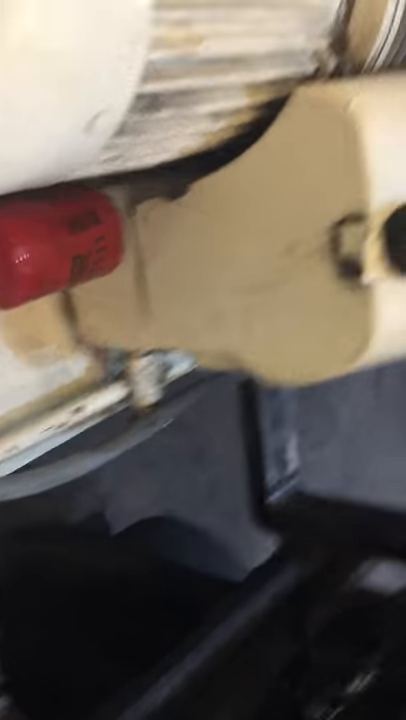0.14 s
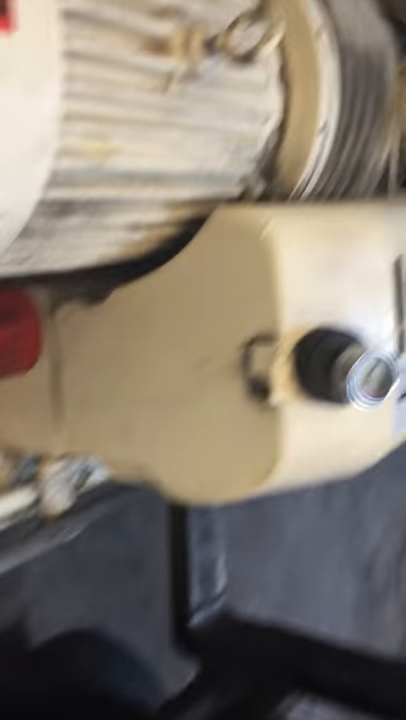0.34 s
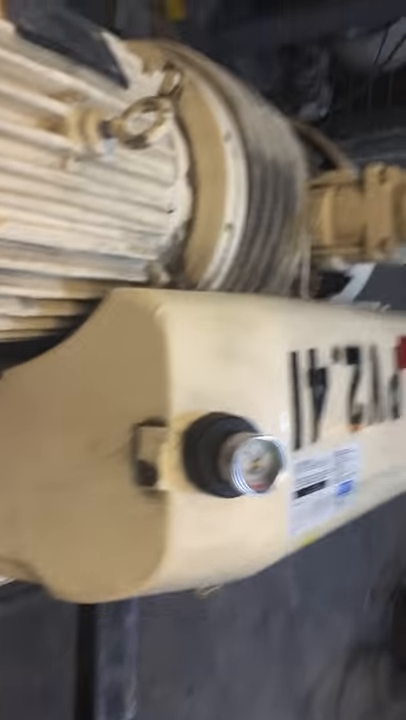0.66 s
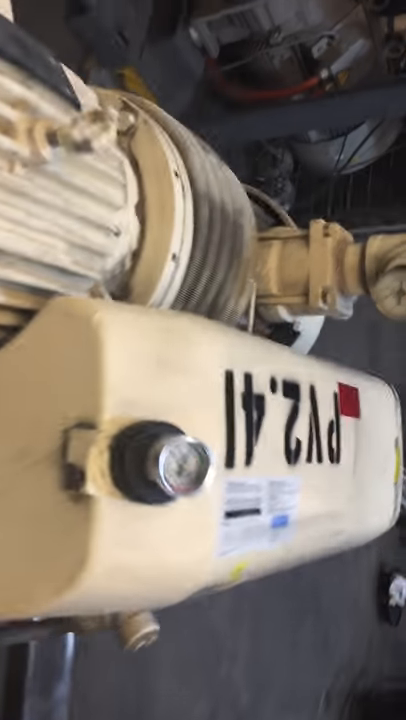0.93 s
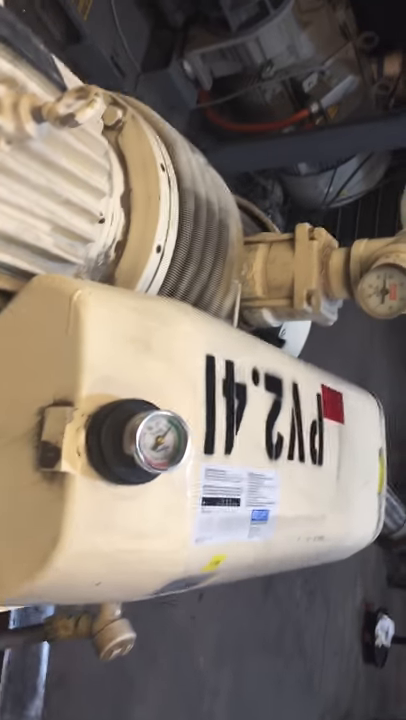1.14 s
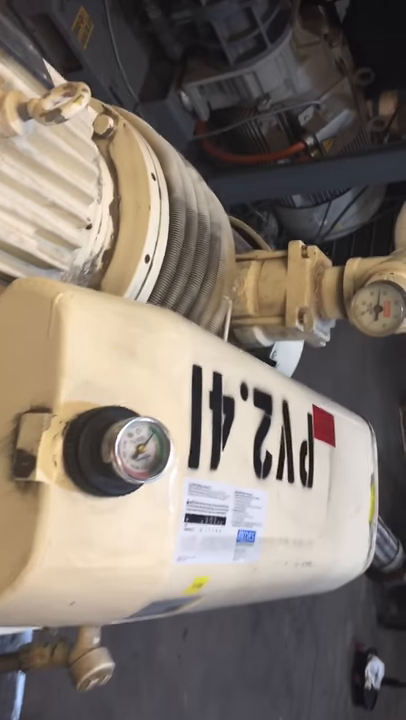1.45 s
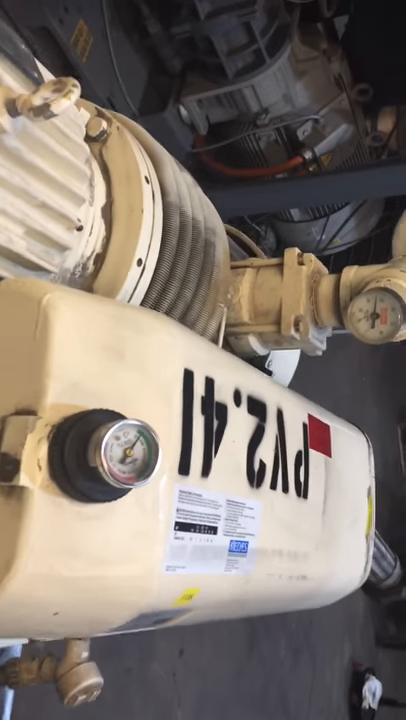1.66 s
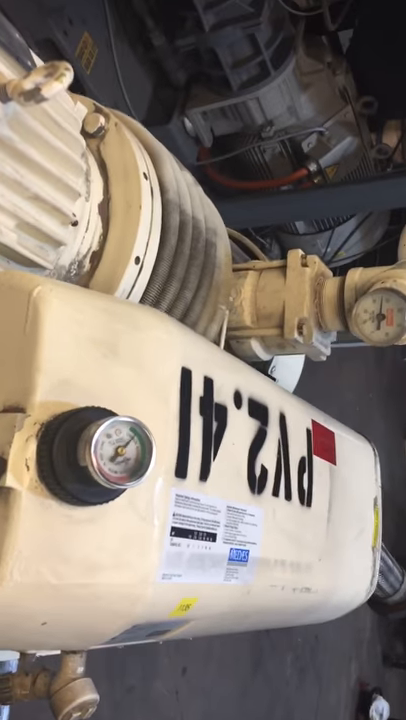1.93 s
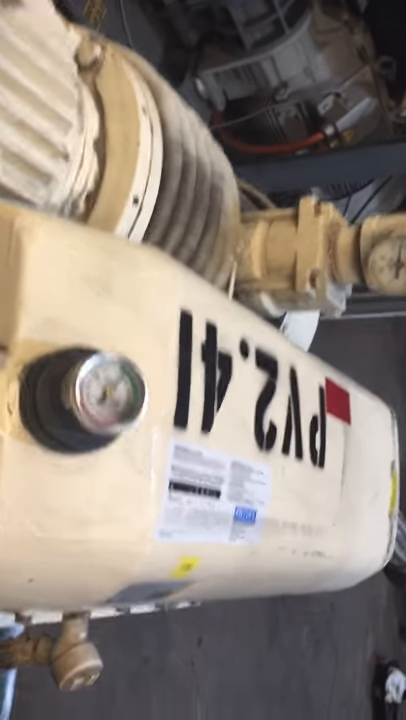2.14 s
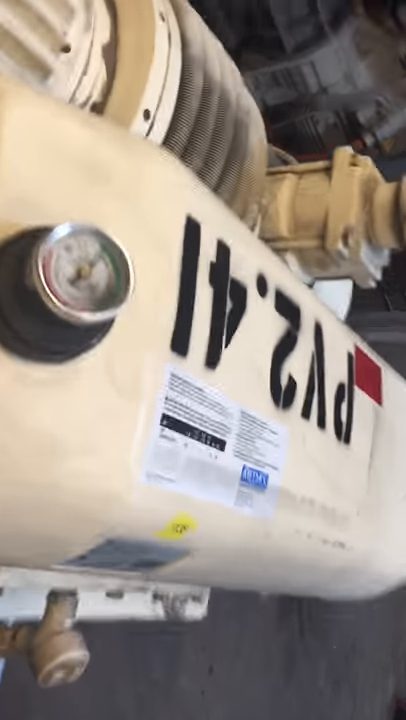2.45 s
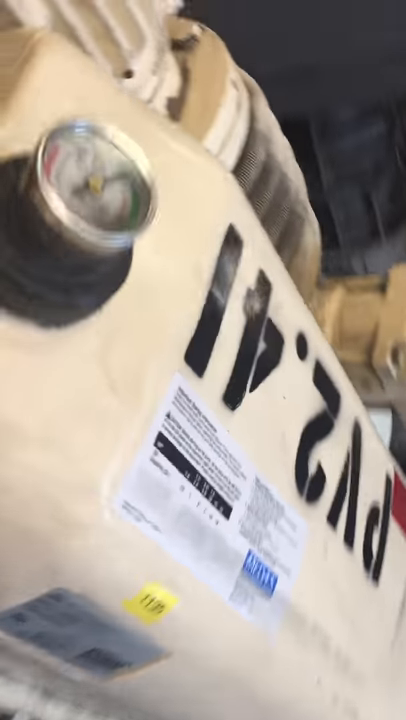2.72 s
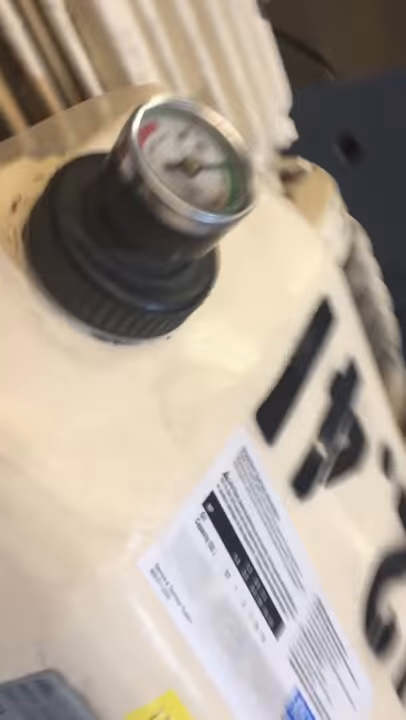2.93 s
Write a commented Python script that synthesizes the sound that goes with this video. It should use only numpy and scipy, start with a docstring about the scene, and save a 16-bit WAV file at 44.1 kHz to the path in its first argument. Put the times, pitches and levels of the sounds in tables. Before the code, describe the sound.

An industrial vacuum pump runs steadily in a workshop, with a loud buzzing drone, rapid rattle, fan rush and metallic hiss; the handheld microphone moves from motor to tank, then close in, with soft bumps at the end.

```python
"""A rotary vane vacuum pump runs steadily in a workshop: three vanes slap once each per shaft turn.
One repeating clatter gives its hum lines, a fast rattle and a loud drone; noise gives the puffs of air.
The cooling fan is a rush of noise, sliding vanes hiss and make the housing ring, a thin whistle comes and goes.
The microphone moves from the motor over the oil tank, then close to the housing, with soft bumps on the way in."""
import sys
import numpy as np
from scipy.fft import rfft, irfft, next_fast_len
from scipy.io import wavfile
from scipy.ndimage import map_coordinates

SR = 44100
rng = np.random.default_rng(int(sys.argv[2]) if len(sys.argv) > 2 else 0)


def materialize(psi):
    """Save the field psi as 16-bit PCM at rate SR to the path in sys.argv[1].

    A 1-D psi becomes a single channel; in a 2-D psi each row is a channel.
    """
    bounded = np.clip(np.atleast_2d(psi).T, -1, 1)
    quanta = np.round(bounded * 32767).astype(np.int16)
    wavfile.write(sys.argv[1], SR, quanta)


N = 136269

# In the tables, three levels in a row stand for: by the motor, over the tank, close to the housing.
# path of the microphone: t/s, place (0 motor, 1 tank, 2 close to the housing)
MIC_PATH = [(.1, 0), (.42, .03), (.8, .35), (1.3, .9), (1.7, 1), (2.3, 1.08), (2.55, 1.4), (2.8, 1.9),
            (3.05, 2)]
# strong hum lines, before their slow drift: multiple of the shaft rate, three levels/dB
HUM_LINES = [(5, -47.3, -45.2, -46.1), (6, -47.7, -41.7, -35.7), (7, -40.7, -41.7, -39.4),
             (8, -34.6, -35.7, -32.8), (9, -36.8, -28.9, -23.7), (12, -24.4, -30.0, -27.0),
             (15, -33.0, -37.6, -23.6), (18, -30.0, -35.8, -27.4), (21, -29.8, -25.4, -25.6),
             (24, -32.1, -47.2, -41.1), (27, -29.9, -29.6, -35.0), (30, -22.0, -27.9, -28.2),
             (31, -29.7, -36.8, -41.3), (33, -29.8, -29.0, -36.0), (36, -29.6, -31.0, -30.0),
             (39, -31.2, -32.0, -37.8), (44, -40.1, -37.0, -42.0), (45, -39.1, -38.0, -36.3),
             (54, -38.3, -40.8, -33.1), (57, -35.1, -38.3, -32.0)]
# swell of the loudest line: t/s, level/dB
DRONE_LEVEL = [(.09, -27), (.22, -21), (.42, -18), (.7, -18), (1.15, -17), (2.3, -17.5), (2.55, -21),
               (2.8, -25), (3.08, -28.5)]
# vane slaps within a turn: share of the turn, strength/dB
VANE_SLAPS = [(0, -2), (.33, 0.5), (.67, -2.5)]
# weak shaft lines, before a random spread: f/Hz, three levels per line/dB
RATTLE_COLOUR = [(29, -68, -68, -66), (120, -57, -50, -59), (450, -41.5, -49, -58), (720, -46, -50, -46),
                 (950.0, -39.5, -43, -37), (1250, -39, -46, -45), (1480, -44.5, -44, -50),
                 (1680.0, -40, -53, -38.5), (1960.0, -50, -51, -48), (2280.0, -47.0, -50, -47),
                 (2690.0, -54, -55, -52.7), (3250, -51, -48, -51), (3740, -59, -62, -61),
                 (5070, -68, -70, -70)]
# colour of the air puffed out with each slap: f/Hz, relative level/dB
PUFF_COLOUR = [(100, -27), (300, -16.5), (520, -6.5), (900, 1.5), (1250, 7.5), (1450, -3), (1700, -4),
               (2000, -9.5), (3300, -14), (5000, -49), (15000, -40)]
# loudness of the puffs: three levels/dB
PUFF_LEVELS = [-26.5, -29, -25]
# colour of the cooling fan: f/Hz, relative level/dB
FAN_COLOUR = [(20, -42), (35, -30), (60, -11), (110, -2.5), (190, -1), (350, -3), (500, -7), (800, 2),
              (1200, -3), (2000, -9), (4000, -19.5), (15000, -45)]
# loudness of the fan: three levels/dB
FAN_LEVELS = [-24.5, -24, -23]
# resonances of the housing: f/Hz, width/Hz, three levels/dB
HOUSING_RINGS = [(95, 45, -66, -43.5, -40.5), (165, 57, -41, -42.5, -39), (341, 73, -29.5, -37, -34),
                 (448, 90, -44.5, -46, -28), (1700, 190, -34.5, -39.5, -29), (2150, 510, -33.5, -43, -39),
                 (3796, 69, -40, -41.5, -38), (4040, 134, -28.5, -31, -32), (4173, 140, -32.5, -35, -30.5),
                 (4570, 200, -39, -36, -34.5), (5194, 95, -37.5, -36, -34.5), (5380, 120, -39, -37, -41),
                 (6256, 145, -36, -35.5, -35.5), (6560, 290, -38, -36, -33), (7126, 150, -38, -38.5, -38.5),
                 (8040, 160, -43, -42.5, -40), (8900, 350, -42, -44.5, -47), (9820, 130, -48, -49, -43)]
# spells in which a housing resonance sings out: start t/s, end t/s, f/Hz, level/dB
SINGING_SPELLS = [(0.029, 0.36, 4070, -28.5), (0.58, 1.9, 4030, -32), (2, 2.65, 4230, -33),
                  (0.32, 0.65, 6280, -32), (2.72, 2.98, 6300, -33), (.6, 1.13, 8050, -40),
                  (2.3, 2.8, 8050, -42)]
# colour of the sliding vanes' hiss: f/Hz, relative level/dB
HISS_COLOUR = [(1500, -16), (3000, 1), (4500, 0.5), (5700, 3.5), (6700, 1), (7600, -0.5), (9800, -1.5),
               (11000, -5), (13500, -4.5), (15700, -8)]
# loudness of the hiss: three levels/dB
HISS_LEVELS = [-30, -30, -29.5]
# whistle, before its waver: t/s, level/dB
WHISTLE_LEVEL = [(.1, -59), (.5, -42), (.75, -45), (1.1, -38), (1.35, -45), (1.62, -36), (2, -43),
                 (2.25, -41), (2.55, -48), (3.05, -40)]
# bumps of the microphone in the hand: t/s, level before dying away/dB, f/Hz
BUMPS = [(2.897, -23, 62), (2.955, -27, 68), (3.06, -28, 58)]

SHAFT_HZ, SHAFT_JITTER_TURNS = 29.228, .0006
DRONE_ORDER = 42  # multiple of the shaft rate
HUM_DRIFT_DB, HUM_DRIFT_RATE = 1.1, 3.5  # every RATE counts random knots per second
SLAP_DECAY_S, SLAP_FLOOR = 0.0048, 0.28  # the floor is the steady force under the slaps
SCATTER_RAD, RATTLE_SPREAD_DB = .7, 2.4
PUFF_TAIL = 0.12  # room sound that fills the gaps between puffs
SLAP_TOP_HZ = 3000  # the slaps shake housing resonances below this
RING_WAVER_DB, RING_WAVER_RATE = 1.26, 45
RING_DRIFT_DB, RING_DRIFT_RATE = 0.3, 4.86
SING_WIDTH_HZ, SING_FADE_S = 28.5, 0.072
WHISTLE_HZ, WHISTLE_WAVER_HZ, WHISTLE_WAVER_DB = 10490, 9.9, 2
BUMP_DECAY_S = .014
START_S, TOP_HZ, TOP_ORDER = .084, 15760, 300


def amp(db):
    """Turn decibels into a gain."""
    return 10 ** (np.asarray(db) / 20)


def unit(x):
    """Scale a sound to an average strength (rms) of 1."""
    return x / np.sqrt(np.mean(x ** 2) + 1e-20)


def along(points, hz):
    """Read between (Hz, value) points on a log frequency axis."""
    f, value = np.transpose(points)
    return np.interp(np.log(hz + 1), np.log(f + 1), value)


def curve(rows):
    """Give one value per sample from (s, value) rows."""
    return np.interp(np.arange(N) / SR, *np.transpose(rows))


def wobble(rate):
    """Draw a smooth random curve through rate knots a second."""
    knots = rng.standard_normal(N // 100)
    return map_coordinates(knots, [np.arange(N) * rate / SR], mode="wrap")


def filtered(x, response):
    """Multiply the spectrum of x by a response to frequency."""
    size = next_fast_len(N + 8192)  # spare room lets the filter ring out
    return irfft(rfft(x, size) * response(np.fft.rfftfreq(size, 1 / SR)), size)[:N]


def noise(colour):
    """Make coloured noise of rms 1."""
    return unit(filtered(rng.standard_normal(N), lambda hz: amp(along(colour, hz))))


def ringing(centre_hz, width_hz):
    """Stir a steep resonance with noise, at rms 1."""
    def response(f):
        band = 1j * f * width_hz / (centre_hz ** 2 - f ** 2 + 1j * f * width_hz)
        return band * abs(band) ** .5  # the extra factor makes the sides steeper
    return unit(filtered(rng.standard_normal(N), response))


def heard(levels_db, place):
    """Blend the levels of the three places along the microphone's path."""
    return amp(np.interp(place, np.arange(len(levels_db)), levels_db))


def slaps(turns):
    """Force of the vanes: each slap jumps up and dies away, once a turn."""
    force = SLAP_FLOOR
    for at, db in VANE_SLAPS:
        since_s = ((turns - at) % 1) / SHAFT_HZ
        force = force + amp(db) * np.exp(-since_s / SLAP_DECAY_S)
    return force


def one_turn(size):
    """Shaft harmonics, all of size 1, of a clatter that follows the slaps, scattered by the room."""
    clatter = rng.standard_normal(size) * slaps(np.arange(size) / size) ** 1.5
    spectrum = rfft(clatter)
    scatter = np.exp(1j * SCATTER_RAD * rng.standard_normal(len(spectrum)))
    return spectrum / abs(spectrum) * scatter


def rattle(lines, turns, place):
    """Weak shaft lines between the strong ones; their colour changes from place to place."""
    orders = np.arange(len(lines))
    hz, table = orders * SHAFT_HZ, np.array(RATTLE_COLOUR)
    strong = [0, DRONE_ORDER] + [round(row[0]) for row in HUM_LINES]
    weak = ~np.isin(orders, strong) & (hz < table[-1, 0])
    comb = lines * weak * amp(RATTLE_SPREAD_DB * rng.standard_normal(len(lines)))
    out = 0
    for spot in range(table.shape[1] - 1):
        colour = amp(along(table[:, [0, spot + 1]], hz))
        cycle = irfft(comb * colour, norm="forward") / np.sqrt(2)
        nearness = np.clip(1 - abs(place - spot), 0, 1)
        # the same cycle is read again every turn
        out = out + nearness * np.interp(turns, np.arange(len(cycle)) / len(cycle), cycle, period=1)
    return out


def pump(turns, place):
    """The same clatter repeats every turn, which makes hum lines, the drone and the rattle."""
    lines = one_turn(size=8192)

    def tone(order):
        return np.sqrt(2) * np.cos(2 * np.pi * order * turns + np.angle(lines[order]))

    hum = 0
    for order, *levels in HUM_LINES:
        drift = amp(HUM_DRIFT_DB * wobble(HUM_DRIFT_RATE))
        hum = hum + tone(round(order)) * heard(levels, place) * drift
    drone = tone(DRONE_ORDER) * amp(curve(DRONE_LEVEL))
    return hum + drone + rattle(lines, turns, place)


def puffs(turns, place):
    """Each slap pushes out air: noise that swells in step with the vanes."""
    return unit(noise(PUFF_COLOUR) * (slaps(turns) + PUFF_TAIL)) * heard(PUFF_LEVELS, place)


def fan(place):
    """Stirred air makes an even rush of noise."""
    return noise(FAN_COLOUR) * heard(FAN_LEVELS, place)


def housing(turns, place):
    """Slaps shake the low resonances of the metal; sliding vanes ring the high ones unevenly."""
    shaken = unit(slaps(turns) + PUFF_TAIL)
    out = 0
    for hz, width, *levels in HOUSING_RINGS:
        if hz < SLAP_TOP_HZ:
            drive = shaken
        else:
            waver_db = RING_WAVER_DB * wobble(RING_WAVER_RATE)
            drive = amp(waver_db + RING_DRIFT_DB * wobble(RING_DRIFT_RATE))
        out = out + ringing(hz, width) * heard(levels, place) * drive
    return out


def singing():
    """Narrow housing resonances sing out in spells that fade in and out."""
    t = np.arange(N) / SR
    out = 0
    for start, end, hz, db in SINGING_SPELLS:
        spell = np.clip(np.minimum(t - start, end - t) / SING_FADE_S, 0, 1)
        out = out + ringing(hz, SING_WIDTH_HZ) * amp(db) * spell
    return out


def hiss(place):
    """Sliding vanes rub on the metal: a steady high noise."""
    return noise(HISS_COLOUR) * heard(HISS_LEVELS, place)


def whistle():
    """A thin high tone wavers slightly in pitch and level."""
    hz = WHISTLE_HZ + WHISTLE_WAVER_HZ * wobble(60)
    level_db = curve(WHISTLE_LEVEL) + WHISTLE_WAVER_DB * wobble(50.9)
    return np.sqrt(2) * np.sin(2 * np.pi * np.cumsum(hz) / SR) * amp(level_db)


def handling():
    """Bumps in the hand as the microphone comes in close: low tones that die away fast."""
    out = 0
    for start, db, hz in BUMPS:
        since = np.maximum(np.arange(N) / SR - start, 0)
        out = out + amp(db) * np.sin(2 * np.pi * hz * since) * np.exp(-since / BUMP_DECAY_S)
    return out


def scene():
    """One slightly uneven shaft times the pump sounds; both channels carry the same sound."""
    turns = SHAFT_HZ * np.arange(N) / SR + SHAFT_JITTER_TURNS * wobble(24.87)
    place = curve(MIC_PATH)
    mono = pump(turns, place) + puffs(turns, place) + fan(place)
    mono = mono + housing(turns, place) + singing() + hiss(place)
    mono = mono + whistle() + handling()
    return np.array([mono, mono])


def record(dry):
    """The sound opens quickly after a short silence, and a very steep filter cuts the highest treble."""
    opened = np.clip((np.arange(N) / SR - START_S) / .001, 0, 1)

    def treble_cut(hz):
        return 1 / (1 + (hz / TOP_HZ) ** (2 * TOP_ORDER))

    return np.array([filtered(channel * opened, treble_cut) for channel in dry])


dry = scene()
out = record(dry)
materialize(out)
```